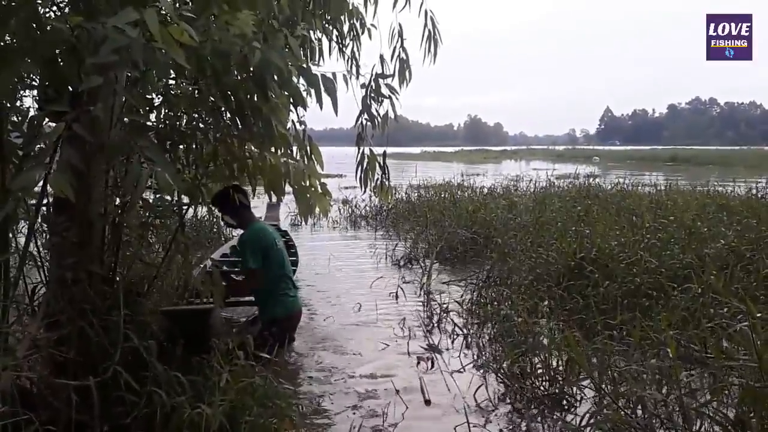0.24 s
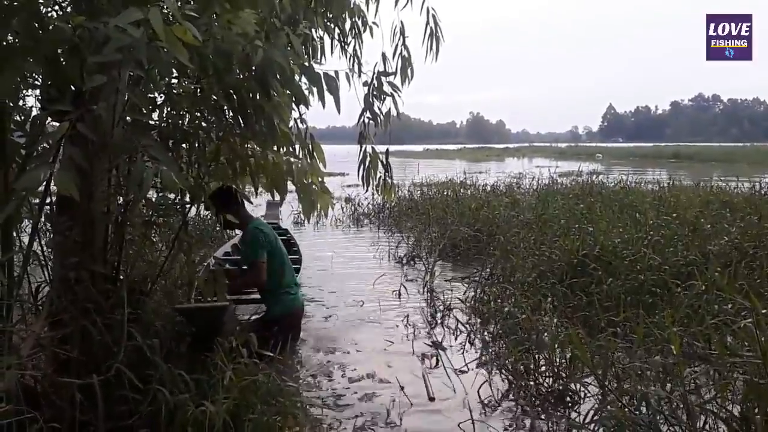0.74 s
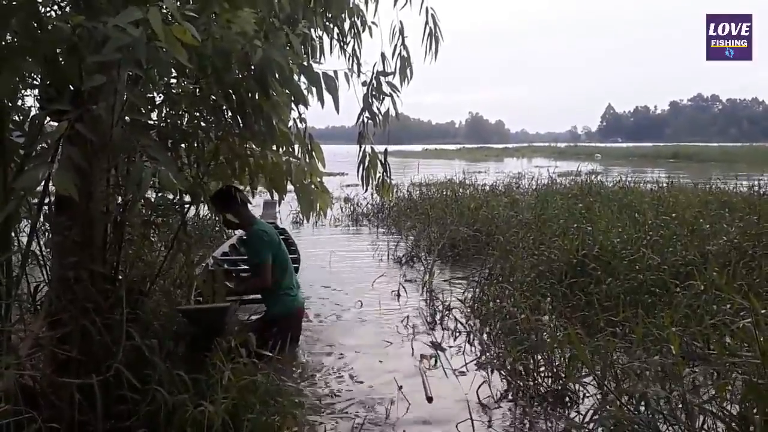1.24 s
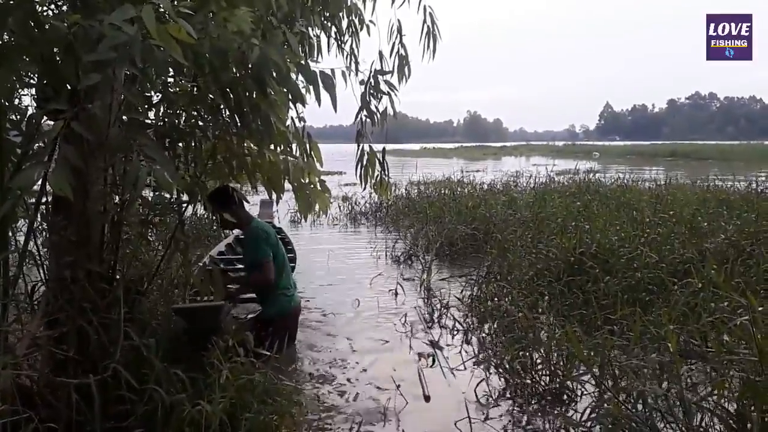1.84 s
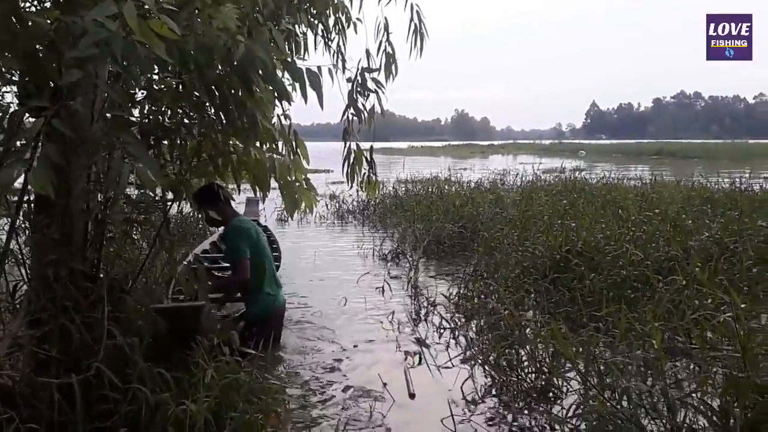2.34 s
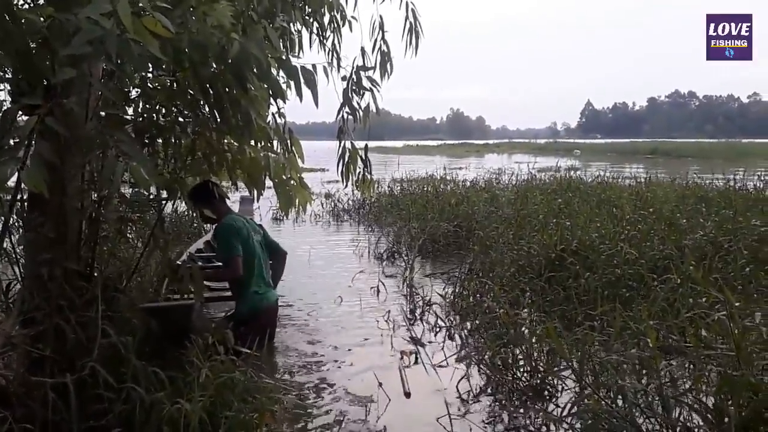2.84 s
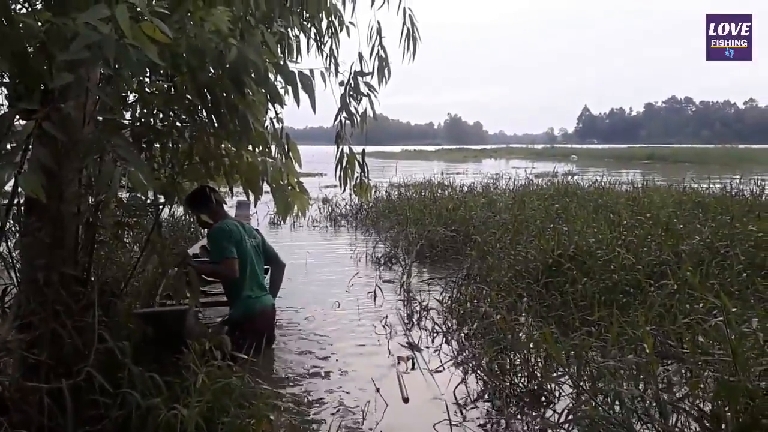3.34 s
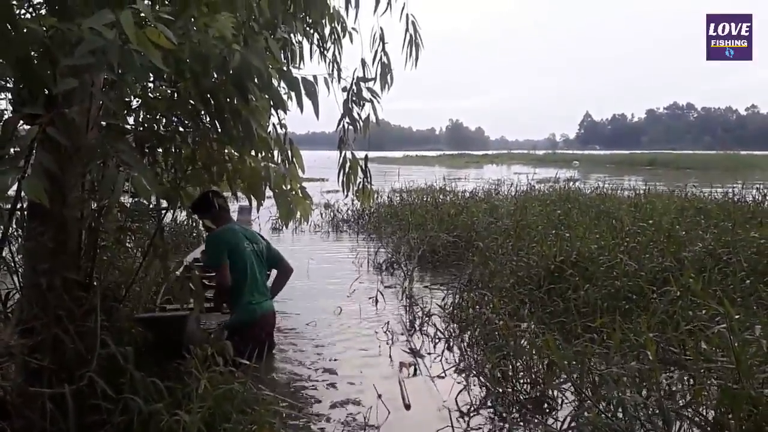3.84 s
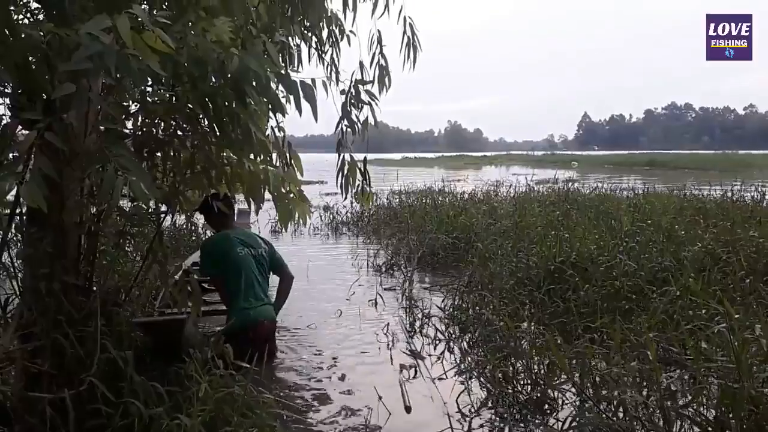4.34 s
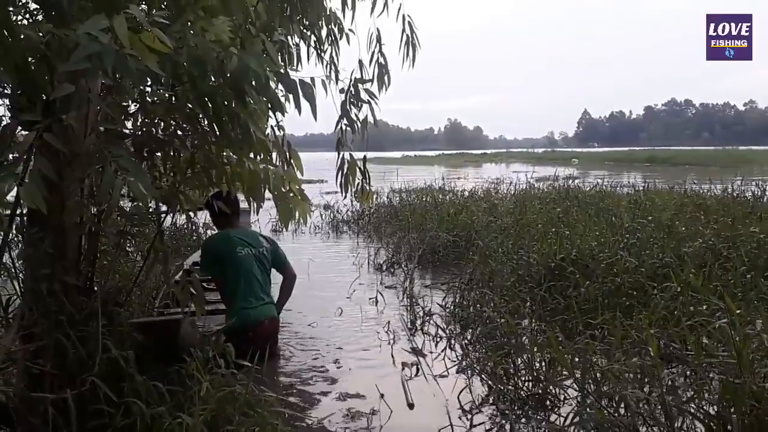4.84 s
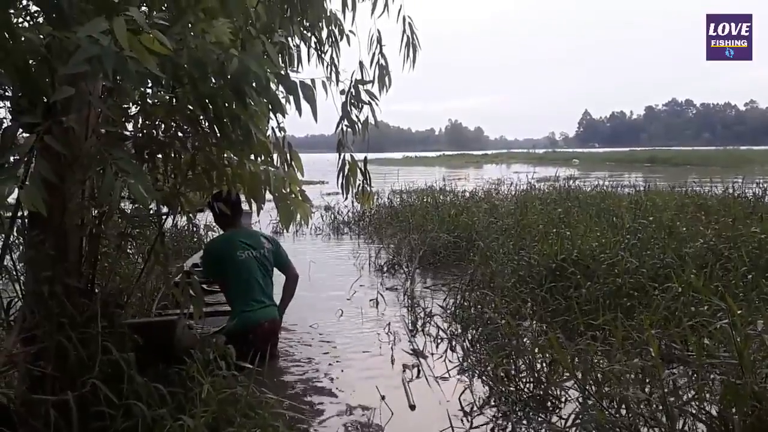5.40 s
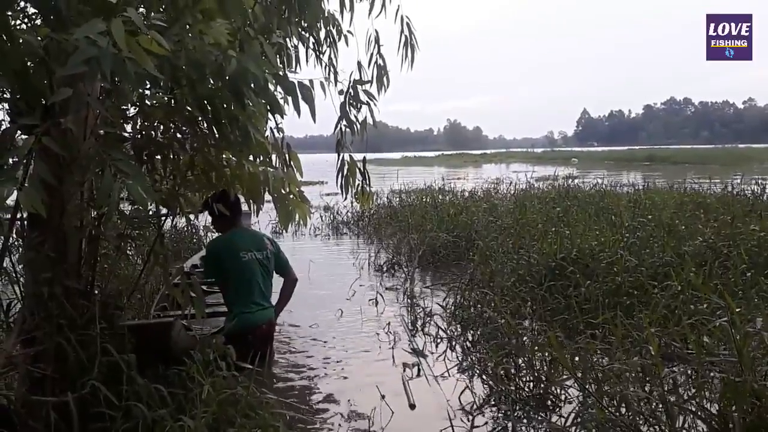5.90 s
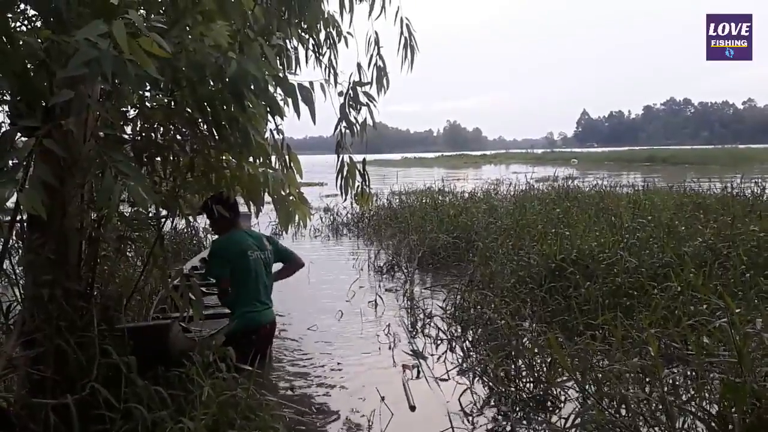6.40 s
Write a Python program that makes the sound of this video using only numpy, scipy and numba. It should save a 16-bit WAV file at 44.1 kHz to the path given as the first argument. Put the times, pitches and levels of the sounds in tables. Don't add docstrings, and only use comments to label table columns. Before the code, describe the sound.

Outdoors in a marsh, a steel chain is hauled over the rim of a hollow wooden boat some metres away. After a few bubbly water plips, dense woody knocks, wet scraping and very high jingling build to hard slaps, thin out, then end with one last heave near four seconds. Steady insect drone, low rumble and soft water wash remain, with faint splashes and dull bumps.

```python
import sys
import numpy as np
from scipy import signal
from scipy.io import wavfile
from scipy.ndimage import uniform_filter1d, map_coordinates
from numba import njit

SR = 44100
rng = np.random.default_rng(int(sys.argv[2]) if len(sys.argv) > 2 else 0)


def volts_from_decibels(level):
    exponent = np.asarray(level, float) / 20
    return 10 ** exponent


def to_wav(s):
    ch = np.atleast_2d(s).T
    pcm = np.round(np.clip(ch, -1, 1) * 32767)
    wavfile.write(sys.argv[1], SR, pcm.astype(np.int16))


N = 293706

# time [s], scrape level [dB].
DRAG = [(0, -64), (.35, -59), (.38, -46), (.75, -45), (1.02, -46), (1.15, -39.5), (1.5, -38), (1.72, -41),
        (1.87, -34), (2.2, -46.5), (2.4, -38.5), (2.6, -48), (2.75, -59.5), (3.3, -54), (3.5, -56),
        (3.62, -43.5), (3.8, -39), (4.02, -68)]
# time [s], bow, rib, plank and stern levels [dB].
PLACE = [
    (1.03, 0, -7, -4, -20),
    (1.08, -20, 0, 0, -20),
    (2.3, -20, 0, 0, -20),
    (2.5, -20, -2, -5, 0),
]
# frequency [Hz], level [dB].
STEEL = [(6500, -29.5), (8500, -33.5), (9200, -19.5), (10500, -16), (11200, -18), (12200, -20),
         (12600, -14), (13000, -7), (13400, -6), (13900, -3.5), (14250, -3), (14600, -3.5), (15100, -8),
         (15450, -18.5)]
HIGH_RING_HZ = 12200


def unit(x):
    return x / np.sqrt(np.mean(x ** 2) + 1e-20)


def along(points, hz):
    f, v = np.transpose(points)
    return np.interp(np.log(hz + 1), np.log(f + 1), v)


def curves(rows, s):
    t, *cols = np.transpose(rows)
    return [np.interp(s, t, c) for c in cols]


def wobble(rate_hz):
    knots = rng.standard_normal(int(N * rate_hz / SR) + 4)
    return map_coordinates(knots, [np.arange(N) * rate_hz / SR])


@njit
def add(out, start, left, right, step, rise, count):
    for k in range(len(start)):
        z, soft = 1 + 0j, 1.
        for n in range(start[k], min(start[k] + count[k], out.shape[1])):
            out[0, n] += (left[k] * z).imag * (1 - soft)
            out[1, n] += (right[k] * z).imag * (1 - soft)
            z *= step[k]
            soft *= rise[k]


def rings(s, hz, db, t60_s, attack_s, lean_db=0):
    # frequency [Hz], lead [radians].
    lead_rad = [(100, .05), (1290, 0.79), (2070, 2.32), (2580, 0.55), (3620, 3.16), (5600, 3.13)]
    # frequency [Hz], spread [radians].
    scatter_rad = [(300, .08), (1000, .3), (2200, .6), (4000, 1.2), (8000, 2.5)]
    # frequency [Hz], left minus right [dB].
    balance_db = [(300, -0.5), (700, -1.5), (1500, 1.5), (2800, 5.5), (4500, -5.5), (9000, -9.5),
                  (14000, -6.5)]
    parts = np.broadcast_arrays(s, hz, db, t60_s, attack_s, lean_db)
    s, hz, db, t60_s, attack_s, lean_db = (v.ravel() for v in parts)
    spread = along(scatter_rad, hz) * rng.standard_normal((len(s), 2)).T
    half_gain = volts_from_decibels((along(balance_db, hz) + lean_db) / 2 + spread[0])
    half = half_gain * np.exp(.5j * (along(lead_rad, hz) + spread[1]))
    step = np.exp((2j * np.pi * hz - np.log(1000) / t60_s) / SR)
    rise = np.exp(-1 / (attack_s * SR))
    start, count = (s * SR).astype(np.int64), (t60_s * SR).astype(np.int64)
    out = np.zeros((2, N))
    add(out, start, volts_from_decibels(db) * half, volts_from_decibels(db) / half, step, rise, count)
    return out


def rush(spectrum, patchy_db):
    # frequency [Hz], left-right likeness [0 to 1].
    alike = [(60, .9), (130, .86), (290, .72), (640, .36), (1400, .05), (15000, 0)]
    hz, _, z = signal.stft(rng.standard_normal((2, N)), SR, nperseg=1024)
    field = uniform_filter1d(rng.standard_normal(z.shape[1:]), size=14, axis=0)
    field = uniform_filter1d(field, size=5, axis=1)
    turn = np.arccos(np.clip(along(alike, hz), -1, 1))[:, None] / 2
    gain = volts_from_decibels(along(spectrum, hz)[:, None] + patchy_db * unit(field))
    mid, side = z * gain * [np.cos(turn), np.sin(turn)]
    return unit(signal.istft(np.array([mid + side, mid - side]), SR, nperseg=1024)[1][:, :N])


def marsh():
    # time [s], rumble level [dB], insect level [dB].
    levels = [(.2, -62.5, -59.5), (.8, -58, -55), (2.6, -61, -59.5), (3.7, -60, -54.5), (4.1, -62, -63.5),
              (5.5, -64.5, -62.5), (5.75, -64.5, -61.5), (6.0, -63, -62), (6.6, -63.5, -63)]
    # frequency [Hz], level [dB].
    rumble_hz_db = [(12, -50.5), (20, -11), (32, -23), (64, -1.5), (151, -1), (440, -12), (567, -16.5),
                    (698, -18), (900, -21), (1170, -69.5), (1980, -120)]
    hum_hz_db = [(300, -70), (380, -14.5), (400, 4), (420, -5), (450, -11), (480, -14.5), (600, -63)]
    insects_hz_db = [(2350, -51), (4000, -45), (4160, -17.5), (4370, -6), (4640, 3.5), (4940, 0.5),
                     (5020, -3.5), (5500, -19), (7150, -28), (12100, -120)]
    water_hz_db = [(350, -33), (600, -6.5), (699, -6), (789, -12), (1080, -10), (4100, -14.5), (5330, -56),
                   (9020, -120)]
    leaves_hz_db = [(3180, -34), (5400, -13.5), (7170, -12), (9510, -7.5), (12100, -12.5), (14800, -11.5),
                    (15800, -14)]
    t = np.arange(N) / SR
    rumble_db, insect_db = curves(levels, t)
    hum_db = -66.5 - 7.7 * ((t - 5.4) / 1.6) ** 2
    flicker_db = 1.96 * wobble(140) + 0.27 * wobble(2.7)
    rumble = volts_from_decibels(rumble_db + 2.0) * rush(rumble_hz_db, patchy_db=1)
    hum = volts_from_decibels(hum_db) * rush(hum_hz_db, patchy_db=1.5)
    insects = volts_from_decibels(insect_db + flicker_db) * rush(insects_hz_db, patchy_db=1.0)
    water = volts_from_decibels(-66.0 + 0.604 * wobble(47)) * rush(water_hz_db, patchy_db=2.0)
    leaves = volts_from_decibels(-74 + .7 * wobble(30)) * rush(leaves_hz_db, patchy_db=.7)
    return (rumble + hum + insects + water + leaves + stirs()) * volts_from_decibels([[-.7], [.7]])


def scrape():
    s, pick, size = rng.random((9000, 3)).T
    s, hz = s * DRAG[-1][0], 500 * 14 ** pick
    clumps_db = 3 * wobble(45)[(s * SR).astype(int)]
    db = curves(DRAG, s)[0] + clumps_db + 12 * size - 9 * pick - 10
    return rings(s, hz, db, 14 / hz, 0.61 / hz)


def drops():
    # start [s], frequency [Hz], level [dB], t60 [s].
    bubbles = [(.037, 1440, -48, 0.025), (0.066, 3200, -43, 0.022), (0.084, 1260, -53, 0.059),
               (0.102, 1900, -39.5, 0.023), (0.143, 970, -49, 0.077), (3.214, 270, -32.5, 0.048),
               (3.21, 800, -46.5, 0.17), (3.433, 250, -39, 0.059), (3.485, 255, -34.5, 0.07),
               (3.551, 248, -34, 0.061), (4.057, 1590, -49, 0.055), (.249, 1360, -32, 0.027),
               (.249, 2540, -36, 0.028), (.251, 700, -37, 0.028), (0.291, 390, -43, 0.056),
               (5.008, 457, -51, 0.14), (6.045, 2310, -59, .05), (6.07, 1900, -64, 0.046),
               (6.09, 2500, -66, 0.034)]
    s, hz, db, t60_s = np.transpose(bubbles)
    return rings(s, hz, db, t60_s, 1.45 / hz)


def stirs():
    # centre time [s], level [dB], centre frequency [Hz], half length [s].
    swells = [(0.092, -55.5, 3440, 0.041), (0.266, -54.5, 6200, 0.04), (4.42, -59.5, 5270, 0.024),
              (4.513, -64, 3200, 0.03), (5.033, -59.5, 900, 0.04), (5.299, -74, 3200, 0.12),
              (5.925, -59.5, 3660, 0.029), (6.076, -62, 2190, 0.072), (6.194, -66.5, 4980, 0.12),
              (6.411, -54, 1590, 0.018), (6.495, -60.5, 3200, 0.097)]
    t, out = np.arange(N) / SR, np.zeros((2, N))
    for s, db, hz, half_s in swells:
        span = slice(max(round((s - 3 * half_s) * SR), 0), round((s + 3 * half_s) * SR))
        band = signal.butter(3, [hz / 2.64, hz * 1.38], "band", fs=SR, output="sos")
        crackle = rng.standard_normal((2, len(t[span]))) * volts_from_decibels(3.4 * wobble(300)[span])
        swell = np.exp(-((t[span] - s) / half_s) ** 2)
        out[:, span] += volts_from_decibels(db) * swell * unit(signal.sosfilt(band, crackle))
    return out


def knock(s, boom_db, plank_db, rim_db):
    # frequency [Hz], level [dB], t60 [s].
    boom = [(369.2, 1, 0.055), (415, -6, 0.05)]
    plank = [(619, -2, 0.032), (690, -4, 0.045), (791, 4.5, 0.023), (983, 6.5, 0.024), (1053, 7, 0.0079)]
    stern = [(672, -4.5, 0.04), (1000, 1.5, 0.027), (1420, -4.5, .025)]
    rib = [(1177, 0, 0.021), (1384, 7, 0.014), (1620, 7.5, 0.016)]
    rim = [(1923, 3, 0.017), (2174, -8.5, 0.048), (2500, 0.5, 0.022), (2880, -8.5, 0.028),
           (3200, -0.5, 0.011), (3556, -11.5, 0.027), (4180, -6.5, 0.0098), (4760, -22.5, 0.077),
           (5420, -13, 0.0077)]
    bow = [(664, -7, 0.08), (1900, 2, 0.021)]
    at_bow_db, at_rib_db, at_plank_db, at_stern_db = curves(PLACE, s)
    middle_db = (plank_db + rim_db) / 2
    parts = [(boom, boom_db - 1.5), (plank, plank_db + at_plank_db - 4.5), (stern, plank_db + at_stern_db),
             (rib, middle_db + at_rib_db - 5.5), (rim, rim_db - 4.5), (bow, middle_db + at_bow_db)]
    wet_damping = .8
    hz, level_db, t60_s = np.concatenate([modes for modes, _ in parts]).T * [[1], [1], [wet_damping]]
    share_db = np.stack([part_db for modes, part_db in parts for _ in modes], axis=1)
    chance = rng.standard_normal((len(s), 4, len(hz)))
    start_s = s[:, None] + .0014 * abs(chance[:, 3])
    shifted_hz = hz * (1 + np.where(hz < 500, .012, 0.014) * chance[:, 0])
    db = share_db + level_db + 2 * chance[:, 1]
    return rings(start_s, shifted_hz, db, t60_s * np.exp(0.1075 * chance[:, 2]), 0.67 / hz)


def hull():
    # start [s], blow [dB], boom [dB].
    bow_knocks = [(0.1699, -44.5, -38.5), (0.25, -40, -54), (.365, -28.5, -29), (0.3739, -24.5, -32),
                  (0.394, -45, -27.5), (0.4093, -26.5, -43), (0.4207, -25.5, -27.5), (0.456, -33.5, -24),
                  (0.484, -34, -28.5), (.495, -46, -22), (0.518, -41, -42), (0.533, -39, -25),
                  (0.5741, -29, -25), (.622, -63, -35), (0.6563, -31.5, -27.5), (0.6995, -26.5, -50),
                  (.707, -25.5, -23.5), (0.7368, -27, -25), (.757, -25, -27), (0.777, -27, -21),
                  (0.7963, -22.5, -26), (0.8236, -26.5, -27), (.855, -31, -40), (0.9, -35, -18),
                  (0.932, -54, -33.5), (0.951, -24, -26), (0.9975, -32, -41), (1.004, -29.5, -24)]
    rib_knocks = [(1.065, -19.5, -23), (1.0871, -29.5, -48), (1.114, -39.5, -25), (1.0578, -29, -48),
                  (1.156, -27, -41.5), (1.2004, -33, -46), (1.2523, -31.5, -21), (1.3685, -31, -33),
                  (1.412, -30.5, -26), (1.479, -31, -49), (1.5018, -53, -53), (1.7068, -37.5, -45.5),
                  (1.7657, -35, -42), (2.002, -36, -61), (2.021, -26, -39), (2.028, -30, -27),
                  (2.1677, -35, -49), (2.2191, -39, -42), (2.2645, -24.5, -19), (1.2262, -28, -22),
                  (1.275, -30.5, -23.5), (1.3336, -29, -30), (1.3783, -24, -55), (1.3995, -24, -35),
                  (1.4346, -29, -38), (1.465, -28.5, -28), (1.5237, -25.5, -16), (1.5688, -25.5, -21.5),
                  (1.597, -23, -65), (1.6263, -28, -30.5), (1.6831, -31.5, -51), (1.749, -45, -27.5),
                  (1.7819, -31, -31.5), (1.801, -34, -24), (1.8428, -15, -38), (1.897, -28, -40),
                  (1.9307, -33, -24), (1.9893, -29, -24), (2.0844, -27, -19), (2.121, -24.5, -39),
                  (2.1339, -24.5, -46), (2.1453, -27.5, -30), (2.1849, -31.5, -21), (2.236, -18.5, -17.5),
                  (2.2544, -18, -46)]
    slack_knocks = [(2.3468, -27.5, -65), (2.36, -29.5, -51), (2.372, -22, -35), (2.4043, -46, -29),
                    (2.5152, -33.5, -52), (2.527, -25, -38), (2.5386, -23.5, -44), (2.5791, -31, -40),
                    (2.672, -28, -37), (2.8205, -47, -67), (3.1071, -34, -40), (3.1704, -52, -65),
                    (3.203, -34, -45), (3.2771, -35.5, -39), (3.3525, -31, -41), (3.3806, -32, -44),
                    (3.3969, -46, -53), (3.482, -37.5, -39), (3.535, -33.5, -39), (3.568, -23.5, -29.5),
                    (3.59, -33, -28.5), (3.5962, -30.5, -44.5), (3.649, -31.5, -57), (3.7264, -25, -45.5),
                    (3.7466, -17.5, -28), (3.682, -24.5, -32), (3.788, -32.5, -43), (3.8557, -30.5, -48),
                    (3.903, -36, -63), (3.927, -37, -64), (4.0664, -49, -44)]
    nudges = [
        (4.763, -70, -51),
        (5.007, -55.5, -39.5),
        (5.9, -62, -78),
        (6.393, -52, -38.5),
        (6.415, -65, -41),
        (6.481, -65, -42),
    ]
    slams = [
        (1.142, -16, -42),
        (1.2972, -14.5, -29.5),
        (1.8306, -13, -27.5),
        (2.0127, -19.5, -39),
        (2.2783, -14.5, -34),
        (3.6906, -17, -37),
    ]
    # time from the main blow [s], level [dB].
    whip = [
        (-.008, -4.5),
        (0, 1.5),
        (.006, -16.5),
        (.016, -21.5),
    ]
    # frequency [Hz], level [dB], t60 [s].
    crack = [(1118, -6.5, 0.0045), (2500, -9, 0.0037), (3860, -4, 0.0022)]
    even_db, brighten_db_per_db = -39, 0.14
    slack_s, slack_dull_db = 2.3, 1.5
    rattle_rel_db, bow_rattle_db = -5.5, 6

    whips = [(s + late_s, blow_db + db, boom_db + db)
             for s, blow_db, boom_db in slams for late_s, db in whip]
    s, blow_db, boom_db = np.transpose(bow_knocks + rib_knocks + slack_knocks + nudges + whips)
    bright_db = brighten_db_per_db * (blow_db - even_db) - slack_dull_db * (s > slack_s)
    blows = knock(s, boom_db, blow_db - bright_db, blow_db + bright_db)
    hz, level_db, t60_s = np.transpose(crack)
    cracks = rings(s[:, None], hz, (blow_db + bright_db)[:, None] + level_db, t60_s, .00006)

    s, size = rng.random((1300, 2)).T
    s = s * DRAG[-1][0]
    scrape_db = curves(DRAG, s)[0] + 12 * size - 9
    rattle_db = scrape_db + rattle_rel_db + bow_rattle_db * (s < PLACE[0][0])
    rattle = knock(s, rattle_db + 1.0, rattle_db - 0.5, scrape_db - 4.0)
    no_bass = signal.butter(3, 230, "high", fs=SR, output="sos")
    return signal.sosfilt(no_bass, blows + cracks + rattle)


def pitches(pick):
    mode = np.floor(pick * 260)
    return np.interp((mode + 1.5 * np.sin(mode ** 2)) / 260, [0, .5, 1], [6500, 12500, 15800])


def shake(s):
    # time [s], peak level [dB].
    tugs = [(.87, -34), (1.075, -25.5), (1.17, -47), (1.31, -30), (1.42, -35), (1.61, -26.5), (1.849, -22),
            (1.922, -33), (2.031, -27), (2.13, -31), (2.279, -26.5), (2.37, -37), (2.47, -36), (2.548, -24),
            (2.86, -45), (3.07, -31), (3.25, -42), (3.59, -35), (3.705, -17), (3.762, -25), (3.88, -62),
            (4.085, -78)]
    rise_db_per_s, fall_db_per_s = 448, 164.5
    idle_db = -4.5
    low_db, low_slope, low_most_db = -21.5, -0.28, 8
    at_s, peak_db = np.transpose(tugs)[:, :, None]
    tugs_db = peak_db - np.maximum(rise_db_per_s * (at_s - s), fall_db_per_s * (s - at_s))
    idle_power = volts_from_decibels(2 * (curves(DRAG, s)[0] + idle_db))
    jingle_db = 10 * np.log10(np.sum(volts_from_decibels(2 * tugs_db), axis=0) + idle_power)
    return jingle_db, np.minimum(low_db + low_slope * jingle_db, low_most_db)


def sliding_links():
    # time [s], extra left minus right [dB].
    swing = [
        (0, -1.5),
        (2.2, 0),
        (2.6, 3.5),
        (3.3, 2.5),
        (3.7, 0.5),
    ]
    rest_s = 4.25
    low_life = .4
    s, pick, size, life = rng.random((12000, 4)).T
    s, hz = s * rest_s, pitches(pick)
    low = hz < HIGH_RING_HZ
    jingle_db, low_db = shake(s)
    db = jingle_db + np.where(low, low_db + 17.5, 0) + along(STEEL, hz) + 9 * size - 13.0
    db += 4 * wobble(40)[(s * SR).astype(int)]
    t60_s = (0.0354 + 0.14 * life ** 2) * np.where(low, low_life, 1) * (hz / 14000) ** 0.5
    slide = rings(s, hz, db, t60_s, 0.00018, curves(swing, s)[0])
    ticks = rings(s, 3000 + 6000 * life, jingle_db + low_db - 12.0 + 14 * size, 0.0025, .0001)
    return slide + ticks


def jolted_links():
    # time [s], peak [dB], strongest ring [Hz], left minus right [dB].
    clinks = [(0.376, -37.5, 13300, -2), (0.505, -35.5, 14800, 0), (0.528, -37, 14800, -5.0),
              (0.5801, -30, 15000, 2), (0.699, -24.5, 12400, -1), (0.7565, -28, 12600, -1),
              (0.845, -24.5, 14400, 0.5), (0.9981, -54, 14600, 2), (1.0585, -44.5, 13800, -1),
              (1.0773, -27.5, 15000, -12), (1.1483, -25, 13600, -4.0), (1.1673, -30.5, 14600, -9),
              (1.2408, -32, 13500, -8.0), (1.299, -37, 14800, -4), (1.476, -26, 15000, -1),
              (1.576, -29.5, 13300, -3), (1.6046, -26.5, 13100, -9), (1.7849, -46, 13100, -4),
              (1.802, -33.5, 13800, -4.5), (1.84, -18.5, 13900, -10), (1.9004, -21.5, 13200, -8.5),
              (2.0138, -28, 13500, -10), (2.0557, -26.5, 13500, -8), (2.1141, -23.5, 13000, -5.5),
              (2.257, -25, 14600, -9), (2.3421, -24, 13800, -9), (2.3685, -30, 14500, -10),
              (2.4585, -31.5, 13200, -12), (2.5044, -30.5, 14400, -10.5), (2.5202, -24, 14400, -17),
              (2.5434, -23, 14600, -11), (2.838, -38, 13500, -8.5), (3.0025, -31.5, 14500, -5.0),
              (3.033, -19.5, 13900, -5), (3.0642, -19.5, 14600, -11), (3.22, -33, 15600, -6),
              (3.5488, -35.5, 14200, -10), (3.5723, -32.5, 14300, -9.5), (3.5926, -25.5, 14100, -16),
              (3.6468, -27, 14500, -9), (3.6852, -19.5, 14100, -8), (3.7478, -13, 14600, -8.5),
              (3.9085, -35.5, 14000, -8.5), (4.0781, -53, 14000, -5.5)]
    # frequency [Hz], level [dB].
    snap = [(10600, -15.5), (13000, -6.5), (14300, -4), (15200, -8)]
    favour_width_hz, favour_most_db = 700, 11
    s, db, best_hz, pan_db = np.transpose(clinks)[:, :, None]
    snap_hz, snap_db = np.transpose(snap)
    snaps = rings(s, snap_hz, db + snap_db, 0.0086, .00005, .7 * (pan_db + 6.5))

    pick, late, size = rng.random((len(s), 3, 90)).transpose(1, 0, 2)
    s, hz = s + .012 * late ** 3, pitches(pick)
    nearness = np.exp(-((hz - best_hz) / favour_width_hz) ** 2)
    favour_db = favour_most_db * (nearness - .5) * (hz > HIGH_RING_HZ)
    ring_db = db + along(STEEL, hz) + favour_db - 8.5 - 12 * size
    t60_s = (0.0395 + 0.17 * size) * (hz / 14000) ** 0.76
    jolts = rings(s, hz, ring_db, t60_s, 0.000305, 0.74 * (pan_db + 7))
    contact_db = db + along(STEEL, hz) / 2 - 20.0 - 14 * late
    contacts = rings(s - 0.0069 * late ** 3, hz, contact_db, 0.013, 0.00027)
    spray = rings(s, 3500 + 6000 * size, db - 29.0 - 12 * pick, 0.013, .0001)
    return snaps + jolts + contacts + spray


def free_links():
    # start [s], frequency [Hz], level [dB].
    ringers = [
        (.578, 12300, -44),
        (.842, 4580, -39),
        (.846, 12410, -36),
        (1.6, 11600, -39),
        (3.69, 13870, -30),
    ]
    s, hz, db = np.transpose(ringers)
    return rings(s, hz * [[1], [1.004]], db - 4, .16, .004)


def trees(x):
    # frequency [Hz], t60 [s].
    echo_t60_s = [(300, 0.11), (2000, 0.16), (6000, 0.14), (14000, 0.0126)]
    hop, delay = SR // 5, 150
    out = np.zeros((2, N + SR))
    for start in range(0, N - hop, hop):
        hz, t, z = signal.stft(rng.standard_normal((2, hop)), SR, nperseg=256)
        apart = np.clip(hz / 2500, 0, 1)[:, None]
        pair = np.array([z[0], np.sqrt(1 - apart ** 2) * z[0] + apart * z[1]])
        decay = volts_from_decibels(-60 * t / along(echo_t60_s, hz)[:, None])
        tail = signal.istft(pair * decay, SR, nperseg=256)[1]
        piece = x[:, start:start + 2 * hop]
        faded = piece * np.hanning(2 * hop)[:piece.shape[1]]
        wet = signal.fftconvolve(faded, tail / np.linalg.norm(tail[0]), axes=1)
        out[:, start + delay:start + delay + wet.shape[1]] += wet
    return out[:, :N]


def scene():
    chain = sliding_links() + jolted_links() + free_links()
    boat = scrape() + drops() + hull() + chain
    return marsh() + boat + volts_from_decibels(-7.0) * trees(boat)


def band_limit(x):
    return signal.sosfilt(signal.butter(12, 16620, fs=SR, output="sos"), x)


def record(dry):
    top_hz = 15780
    kept = signal.sosfilt(signal.ellip(8, 1, 30, top_hz, fs=SR, output="sos"), dry)
    return band_limit(kept)


dry = scene()
out = record(dry)
to_wav(out)
```